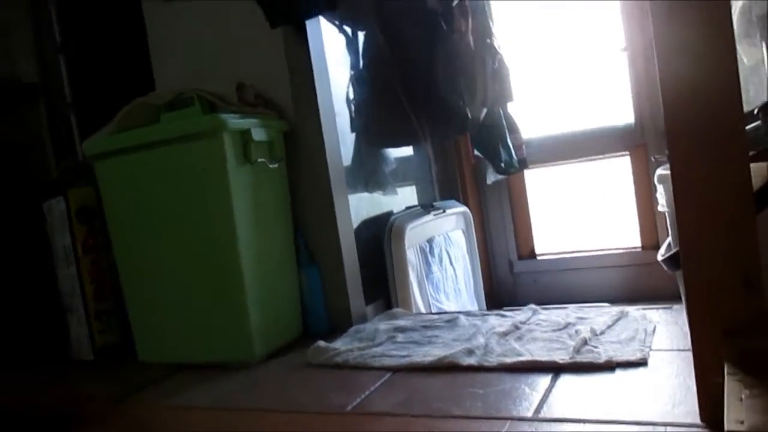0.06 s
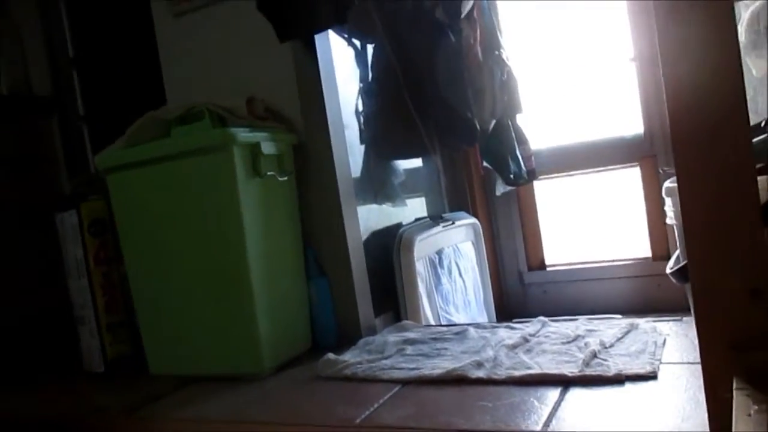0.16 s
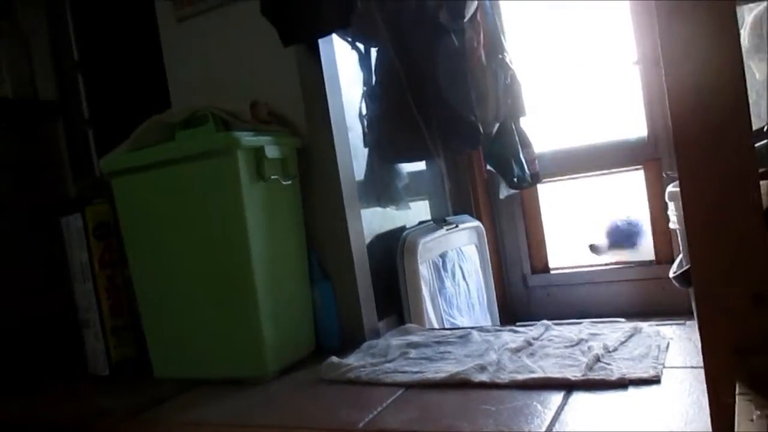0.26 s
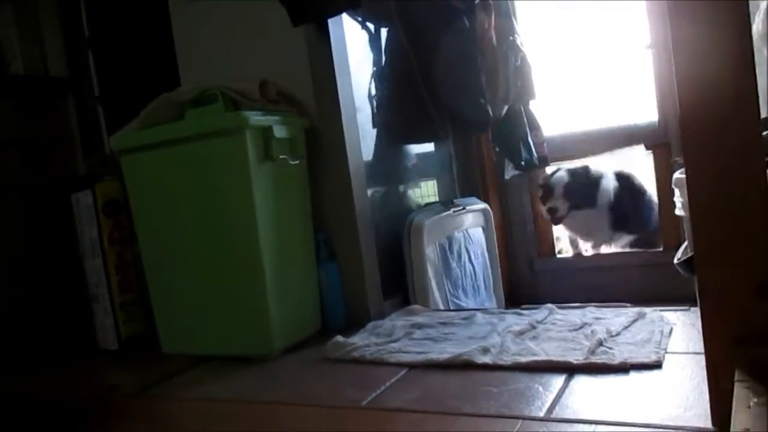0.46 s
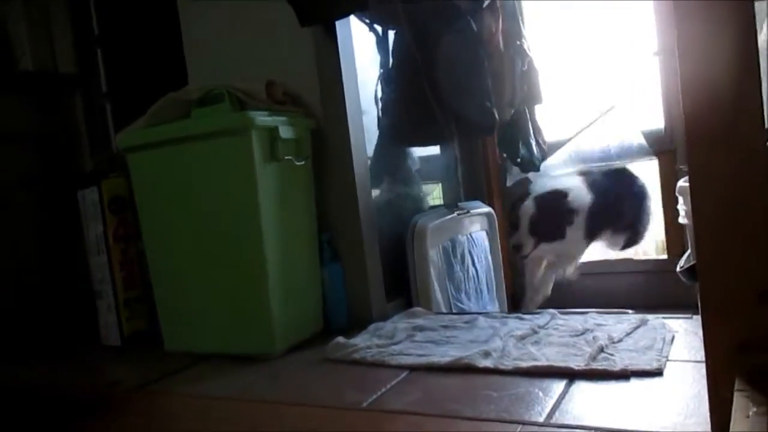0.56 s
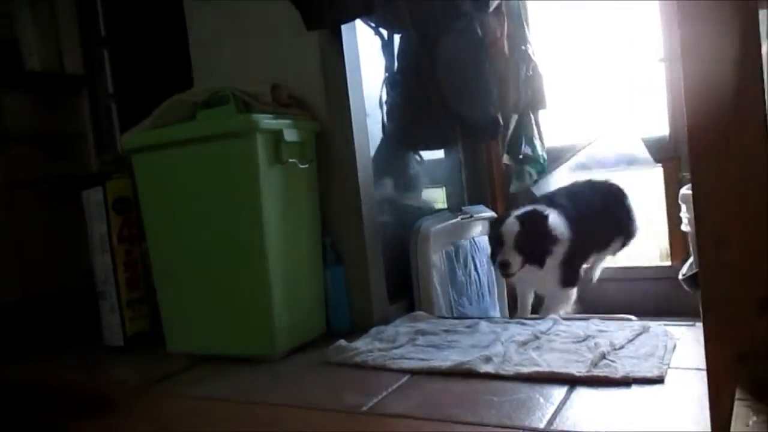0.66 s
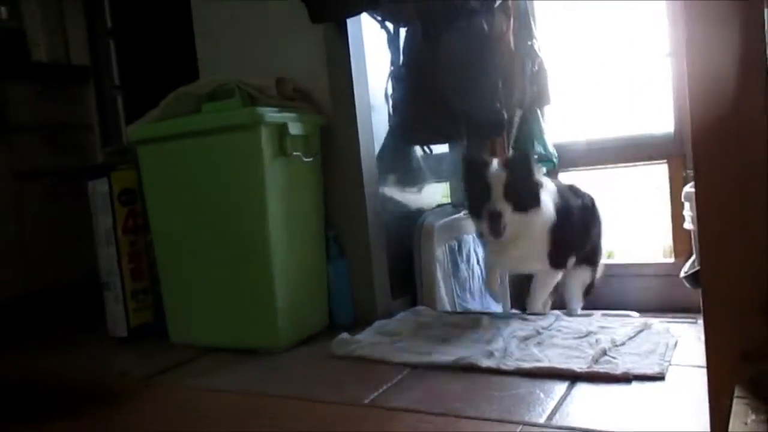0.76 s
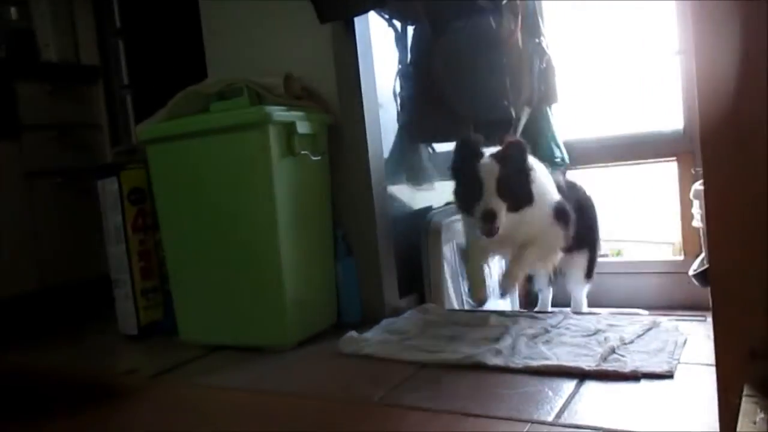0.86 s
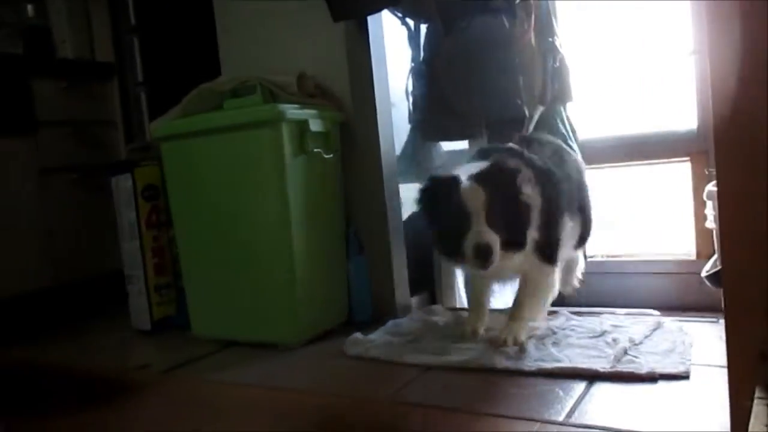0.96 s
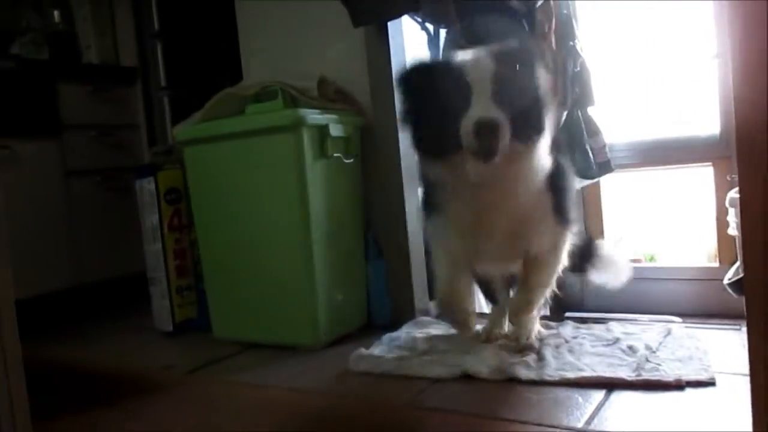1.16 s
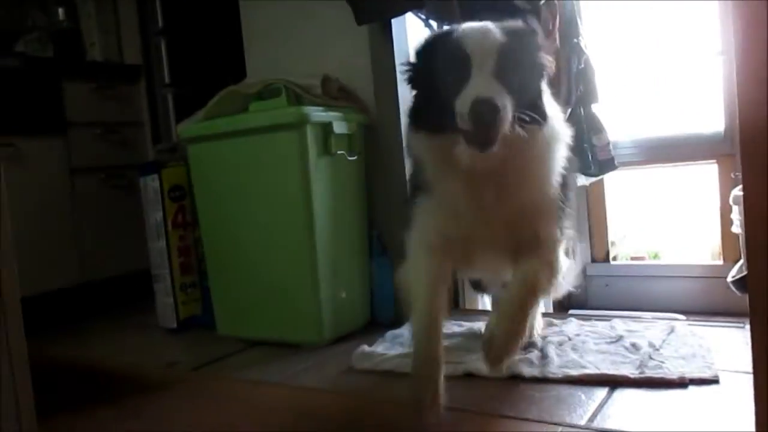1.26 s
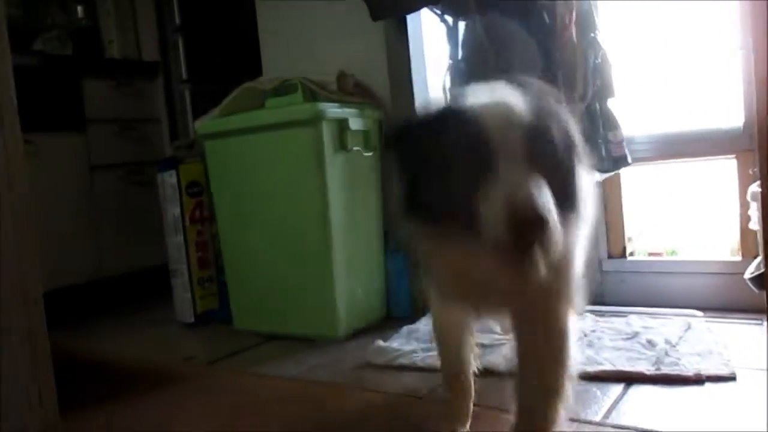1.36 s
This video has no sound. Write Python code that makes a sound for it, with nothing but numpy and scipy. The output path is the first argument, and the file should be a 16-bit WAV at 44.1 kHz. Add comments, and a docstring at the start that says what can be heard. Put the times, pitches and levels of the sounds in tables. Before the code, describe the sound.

A plastic pet flap clicks open at about 0.2 seconds and bangs loudly at 0.4 as a dog pushes through. It clatters quickly from 0.6 seconds, dying away by about 1 second, with a faint brush of fur. Soft paw thuds cross a mat from 0.9 seconds, and a couple of claw ticks hit the tiles around 1.3, over a low, quiet room tone.

```python
"""A plastic pet flap clatters on its door as a dog pushes through into a small tiled room.
The catch snaps open, the dog thumps the frame, and each impact excites modes that die away.
The swinging flap shoves the air and fur brushes through; then paws thud on a mat
and claws tick on the tiles, over a low room tone."""
import sys
import numpy as np
from scipy import signal
from scipy.fft import rfft, irfft
from scipy.io import wavfile
from scipy.ndimage import uniform_filter1d

SR = 44100
rng = np.random.default_rng(int(sys.argv[2]) if len(sys.argv) > 2 else 0)


def dump_mix(stems):
    """Bounce the given channels to the path in sys.argv[1] as a 16-bit WAV at rate SR."""
    frames = np.atleast_2d(stems).T  # one column per channel
    limited = np.clip(frames, -1, 1)  # hard clip at full scale
    pcm = np.round(limited * 32767).astype(np.int16)
    wavfile.write(sys.argv[1], SR, pcm)


N = 61739


def flap():
    """Impacts excite the plastic's modes; a softer contact acts as a lower low-pass filter."""
    # Each row: start in seconds, level in dB, cutoff in Hz, crack level in dB.
    knocks = [(.575, -10, 1200, -26.5), (.5905, -17, 1610, -22.5), (.601, -11, 1280, -26.5),
              (0.6092, -16, 910, -41), (0.6248, -14.5, 2000, -21.5), (0.637, -24, 3020, -26),
              (0.651, -22.5, 3300, -50), (0.6909, -16, 2040, -28), (.703, -20, 2200, -56),
              (0.7107, -22.5, 1500, -35), (.787, -40, 925, -50), (.8155, -29.5, 765, -47),
              (0.838, -26.5, 850, -50), (0.8847, -25.5, 580, -64), (1.022, -38, 1110, -44.5)]
    # Each row: mode frequency in Hz, level in dB, T60 in seconds.
    modes = [(188.4, -20, .17), (303, -21, 0.1), (387, -16, 0.065), (497.3, -14, 0.095), (569.9, -11, .15),
             (615, 4, 0.013), (678.5, 2.5, 0.024), (890, -13.5, 0.022), (940, -6.5, 0.019),
             (1230, -16.5, 0.031), (1343, -25, 0.09), (1674, -23.5, 0.09), (2000, -35, 0.12)]
    # Spectra of the dense modes and the crack. Each row: frequency in Hz, level in dB.
    dense_modes = [(150, -22), (300, -2.5), (650, 3.5), (1050, -0.5), (1350, -2.5), (2200, -19),
                   (5000, -35), (15500, -51)]
    crack_spectrum = [(300, -23), (1200, 4.5), (3000, -8), (4500, -14.5), (7000, -23), (10000, -28.5),
                      (15500, -42)]
    out = np.zeros(N)
    for start, db, cutoff_hz, crack_db in knocks:
        plate = ring(modes) + amp(1) * burst(dense_modes, decay_s=0.0052)
        body = signal.lfilter(*signal.butter(2, cutoff_hz, fs=SR), plate)
        crack = amp(crack_db) * burst(crack_spectrum, decay_s=0.012)
        add(out, start, room(amp(db) * body / abs(body).max() + crack, wet_db=-2.5))
    return out


def frame():
    """The dog strikes the frame: dense modes damp quickly as a bang, while a few ring on."""
    # Each row: start in seconds, level in dB, crack level in dB.
    bangs = [(0.334, -29, -31), (0.4076, -8, -15), (.4135, -9.5, -17), (0.434, -27, -24),
             (.458, -39, -30.5)]
    # Each row: mode frequency in Hz, level in dB, T60 in seconds.
    modes = [(302, -6, 0.12), (430, -0.5, 0.041), (556, 3, .06), (643.3, -3.5, 0.16), (864, -0.5, 0.051),
             (940, -1.5, 0.032), (1424, -23, 0.074), (1790, -14.5, 0.17)]
    # Spectra of the dense modes and the crack. Each row: frequency in Hz, level in dB.
    dense_modes = [(100, -15), (280, -2), (500, 6.5), (800, 10), (1100, -3.5), (1800, -14), (2600, -26),
                   (6000, -57), (15500, -56)]
    crack_spectrum = [(500, -2), (1500, 8), (3000, -2.5), (4500, -9), (7000, -11), (10000, -16.5),
                      (15500, -32)]
    out = np.zeros(N)
    for start, db, crack_db in bangs:
        body = burst(dense_modes, decay_s=0.007) + amp(-12.5) * ring(modes)
        crack = amp(crack_db) * burst(crack_spectrum, decay_s=0.0057)
        add(out, start, room(amp(db) * body + crack, wet_db=1.5))
    return out


def body_bumps():
    """The dog's soft body meets the door: a long contact excites only low frequencies."""
    # Each row: start in seconds, level in dB, pitch in Hz, length in seconds.
    bumps = [(.221, -48, 169, 0.023), (.295, -37.5, 102, 0.035), (.334, -20.5, 148, 0.033),
             (.3345, -26.5, 407, 0.014), (.4065, -4.5, 168.8, 0.0089), (.403, -23, 107, 0.0315),
             (.459, -23, 174.4, 0.018), (.59, -25, 119, 0.023), (.695, -22.5, 108, 0.013),
             (.712, -26, 183, 0.024)]
    return thuds(bumps, wet_db=-7)


def clicks():
    """The catch and hinge snap, and a claw ticks once near 0.85 s: brief contacts of hard material have a wide
    bandwidth."""
    # Each row: start in seconds, level in dB, resonance in Hz.
    snaps = [(.229, -29, 5940), (0.2333, -29.5, 7660), (0.2417, -18.5, 7160), (0.2489, -26, 4700),
             (0.275, -37, 7150), (.377, -33.5, 8300), (0.4216, -24, 6700), (0.654, -39, 10600),
             (.759, -47.5, 10000), (0.848, -36.5, 10900)]
    # Each row: frequency in Hz, level in dB.
    spectrum = [(500, 10.5), (2000, -11), (4000, 0.5), (7000, 1.5), (10000, -7), (15500, -15)]
    out = np.zeros(N)
    for start, db, hz in snaps:
        snap = tick(spectrum, hz, decay_s=0.001, peak_db=11.5, half_width_hz=1100)
        add(out, start, room(amp(db) * snap, wet_db=0))
    return out


def air_puffs():
    """Air displaced by the swinging flap makes a short, very low rumble."""
    # Each row: start in seconds, level in dB, T60 in seconds.
    puffs = [(0.222, -19.5, 0.78), (.42, -30.5, 1), (0.947, -47, 0.33)]
    # Each row: frequency in Hz, level in dB.
    spectrum = [(10, -19), (22, 4), (45, -1.5), (65, -4), (105, -7.5), (190, -8), (300, -19), (500, -30),
                (1500, -78), (15500, -95)]
    out = np.zeros(N)
    for start, db, t60 in puffs:
        add(out, start, amp(db) * burst(spectrum, decay_s=t60 / np.log(1000)))
    return out


def paws():
    """Cushioned impacts on the mat give low thuds."""
    # Each row: start in seconds, level in dB, pitch in Hz, length in seconds.
    steps = [(.875, -29.5, 96.6, 0.049), (.911, -17, 89.8, 0.0265), (.944, -27.5, 157, 0.02),
             (.97, -26, 85.5, 0.043), (1.078, -17, 93.8, .037), (1.085, -37.5, 179, 0.0226),
             (1.119, -35.5, 93, 0.059), (1.279, -28.5, 80.5, 0.029), (1.283, -31.5, 157.4, .025),
             (1.343, -30, 87, 0.032)]
    return thuds(steps, wet_db=-10)


def claws():
    """Hard claws tick, and a firm step excites the tile's modes."""
    # Each row: start in seconds, level in dB, resonance in Hz, tile level in dB.
    taps = [(.908, -35.5, 4160, -57), (1.277, -29.5, 3720, -68), (1.3544, -24, 3430, -21.5)]
    # Each row: frequency in Hz, level in dB.
    spectrum = [(500, 4.5), (2000, 8), (4500, 7.5), (7000, -6), (10000, -10.5), (15500, -23)]
    # Each row: mode frequency in Hz, level in dB, T60 in seconds.
    tile_modes = [(700, -5, .025), (1000, -7, .02), (1440, 0, .025), (2020, -6, .02), (2850, -7, .012),
                  (3440, -1, .014)]
    out = np.zeros(N)
    for start, db, hz, tile_db in taps:
        claw = amp(db) * tick(spectrum, hz, decay_s=0.0011, peak_db=5, half_width_hz=900)
        clack = .5 * amp(tile_db) * ring(tile_modes)
        add(out, start, room(claw + clack, wet_db=0))
    return out


def fur():
    """Friction of fur on frame and mat makes noise with a grainy, fluctuating level."""
    # Each row: time in seconds, level in dB.
    rubbing = [(.2, -66), (0.242, -41.5), (.285, -40.5), (.303, -36), (.325, -40), (.345, -47.5),
               (.375, -43.5), (0.402, -30.5), (0.502, -47.5), (.7, -43), (.8, -53.5), (.9, -49),
               (0.979, -42.5), (1.06, -50.5), (1.22, -67), (1.31, -52), (1.345, -42.5), (1.4, -41.5)]
    # Each row: frequency in Hz, level in dB.
    spectrum = [(80, 10), (300, 3), (900, 0), (1600, -6), (2600, -8), (4500, -16.5), (8500, -18.5),
                (15500, -51)]
    grain = uniform_filter1d(rng.standard_normal(N), size=150)
    level_db = np.interp(np.arange(N) / SR, *np.transpose(rubbing))
    return noise(spectrum, N) * amp(level_db - 2 * grain / grain.std())


def room_tone():
    """Stationary background noise, strongest in the bass."""
    # Each row: frequency in Hz, level in dB.
    spectrum = [(25, 13.5), (65, 8), (150, 7.5), (300, -4.5), (570, -5.5), (900, -12.5), (1800, -17),
                (5000, -24), (11000, -26.5), (15500, -37)]
    return amp(-45) * noise(spectrum, N)


def room(x, wet_db):
    """Reverberation: dense random reflections follow the direct sound and decay by band."""
    # Each row: frequency in Hz, T60 in seconds.
    reverb_times = [(60, 0.44), (200, 0.34), (700, 0.18), (2000, 0.22), (6000, 0.19), (15000, 0.25)]
    gap_s, build_s, reflections_per_s = 0.0011, 0.002, 4000
    t = clock()
    taps = rng.choice([-1., 1.], len(t)) * (rng.random(len(t)) < reflections_per_s / SR)
    hz, times, bands = signal.stft(taps, SR, nperseg=256)
    decay = amp(-60 * times / read(reverb_times, hz)[:, None])
    tail = signal.istft(bands * decay, SR, nperseg=256)[1][:len(t)]
    tail *= np.clip((t - gap_s) / build_s, 0, 1)
    response = amp(wet_db) * tail / np.linalg.norm(tail)
    response[0] += 1  # direct sound
    return signal.fftconvolve(x, response)


def ring(modes, spread_db=2):
    """A sum of damped modes; each blow lands elsewhere and weights them differently."""
    t = clock()
    return sum((-1) ** k * amp(db + spread_db * rng.standard_normal() - 60 * t / t60)
               * np.sin(2 * np.pi * hz * t) for k, (hz, db, t60) in enumerate(modes))


def burst(spectrum, decay_s, rise_s=0.00042):
    """A noise transient with a fast rise and exponential decay."""
    t = clock()
    return .5 * noise(spectrum, len(t)) * np.exp(-t / decay_s) * (1 - np.exp(-t / rise_s))


def tick(spectrum, hz, decay_s, peak_db, half_width_hz):
    """A sharp contact coloured by one broad resonance."""
    f = np.geomspace(200, SR / 2, num=200)
    resonance_db = peak_db / (1 + ((f - hz) / half_width_hz) ** 2)
    return 2 * burst(np.c_[f, read(spectrum, f) + resonance_db], decay_s, rise_s=0.0001)


def thuds(rows, wet_db):
    """Soft contacts: a few low cycles under a half-sine envelope."""
    out = np.zeros(N)
    for start, db, hz, length in rows:
        t = np.arange(0, length, 1 / SR)
        envelope = amp(db) * np.sin(np.pi * t / length)
        add(out, start, room(envelope * np.sin(2 * np.pi * hz * t), wet_db))
    return out


def noise(spectrum, size):
    """Coloured noise of rms 1."""
    gain = amp(read(spectrum, np.fft.rfftfreq(size, 1 / SR)))
    x = irfft(rfft(rng.standard_normal(size)) * gain, size)
    return x / x.std()


def amp(db):
    """Decibels to gain."""
    return 10 ** (np.asarray(db) / 20)


def read(points, hz):
    """Interpolation on a log-frequency axis."""
    f, value = np.transpose(points)
    return np.interp(np.log(hz + 1), np.log(f + 1), value)


def add(mix, start_s, sound):
    """Mixes a sound in at a time."""
    part = mix[round(start_s * SR):][:len(sound)]
    part += sound[:len(part)]


def clock():
    """Half a second of time for one event."""
    return np.arange(SR // 2) / SR


def scene():
    """Superposition of door, dog and room tone in one channel."""
    door = flap() + frame() + clicks() + air_puffs() + body_bumps()
    dog = fur() + claws() + paws()
    return (door + dog + room_tone())[None]


def record(dry):
    """Hard clipping at full scale, then a low-pass band limit."""
    lowpass = signal.firwin(511, 15750, window=("kaiser", 9), fs=SR)
    return signal.oaconvolve(np.clip(dry, -1, 1), lowpass[None], "same")


dry = scene()
out = record(dry)
dump_mix(out)
```